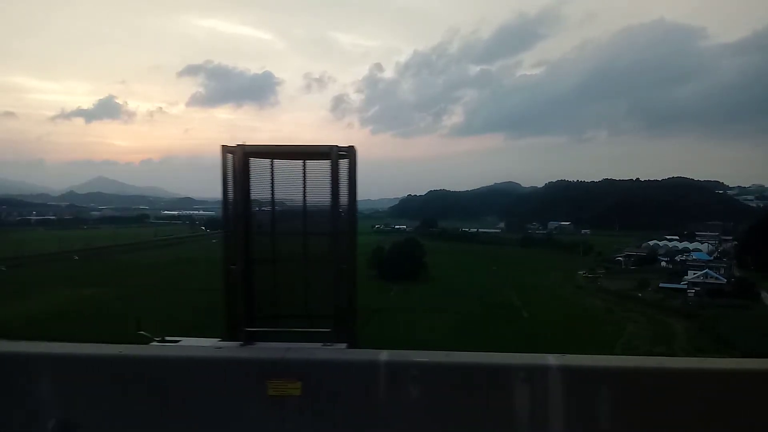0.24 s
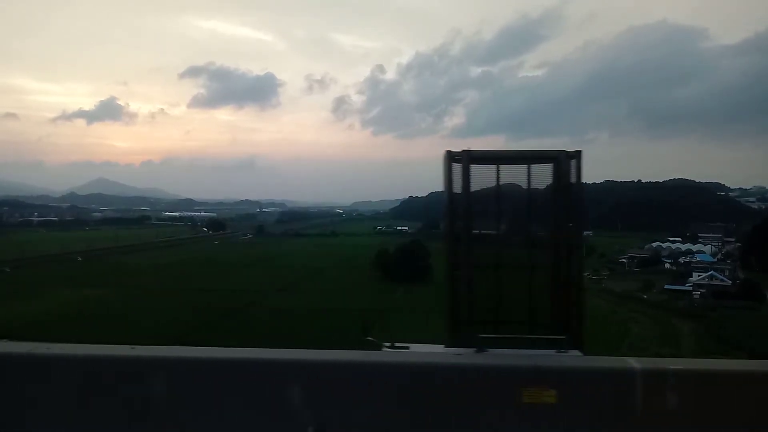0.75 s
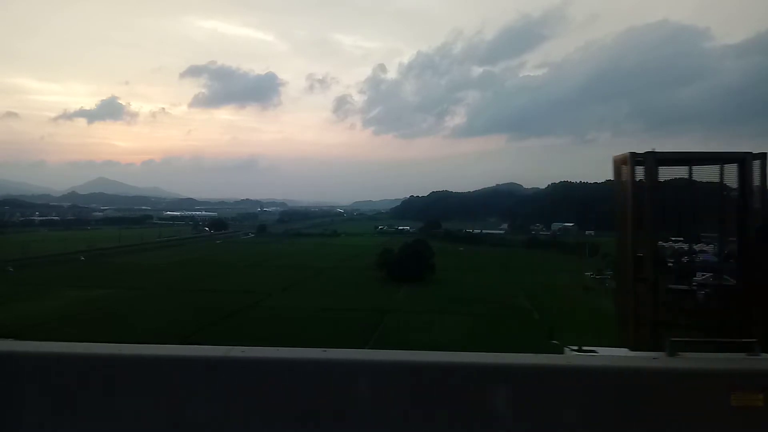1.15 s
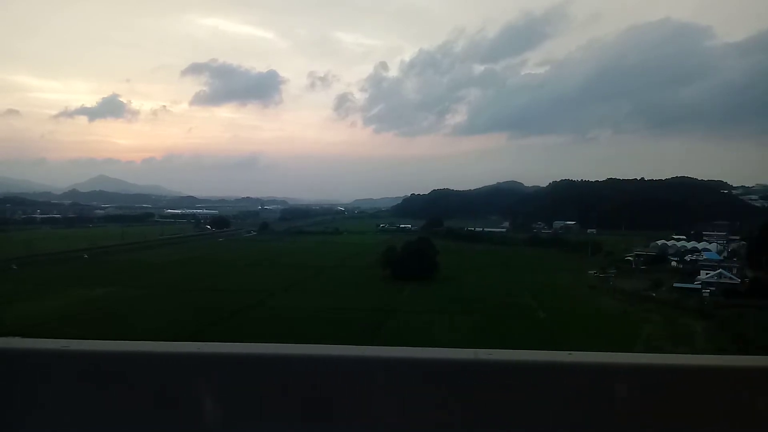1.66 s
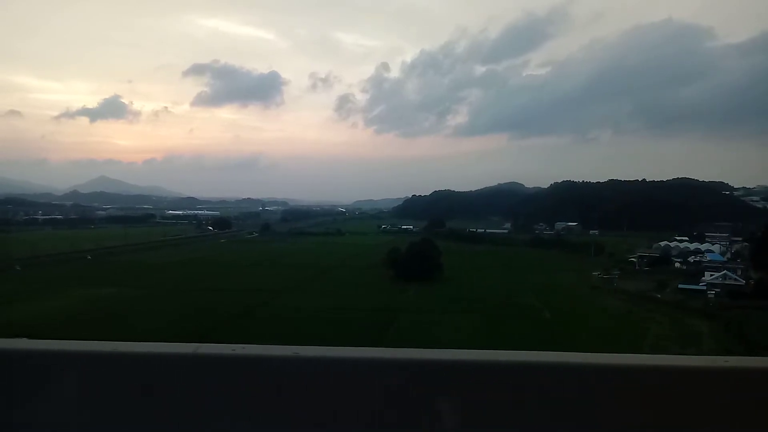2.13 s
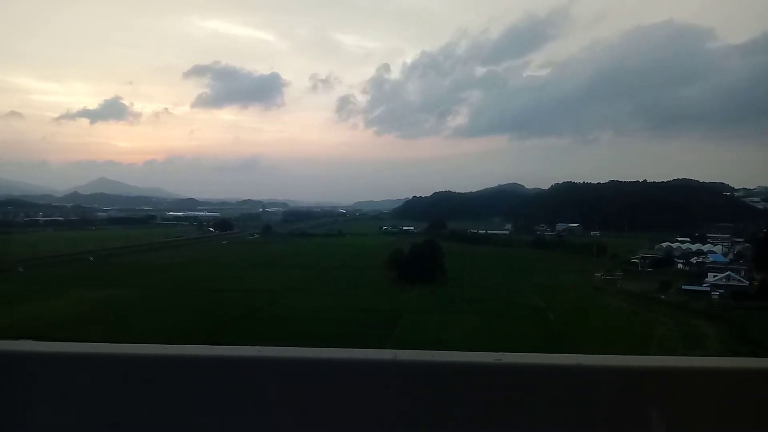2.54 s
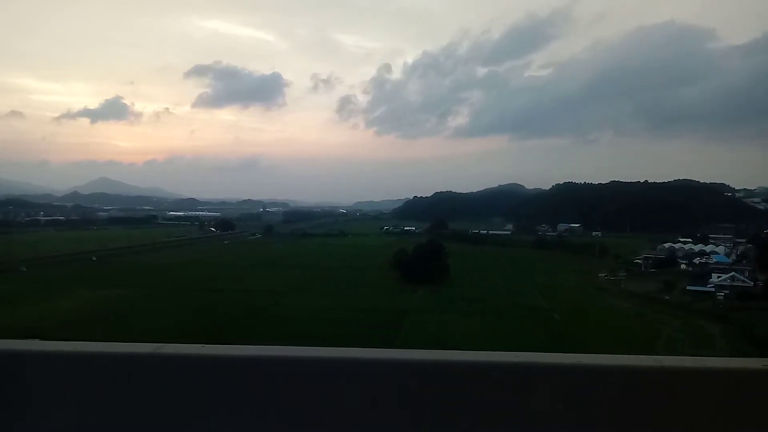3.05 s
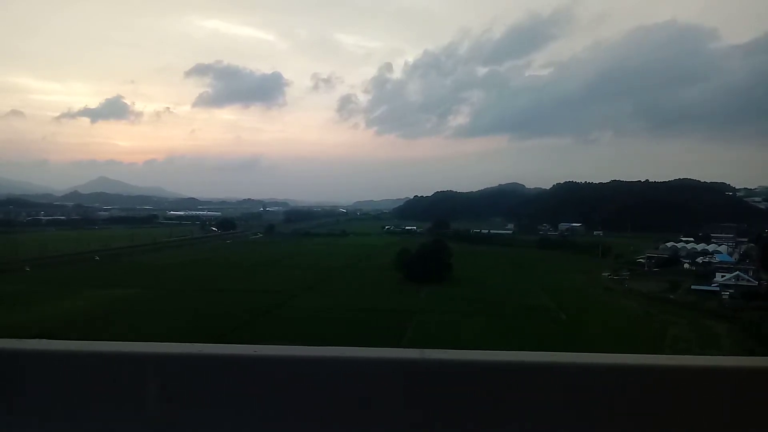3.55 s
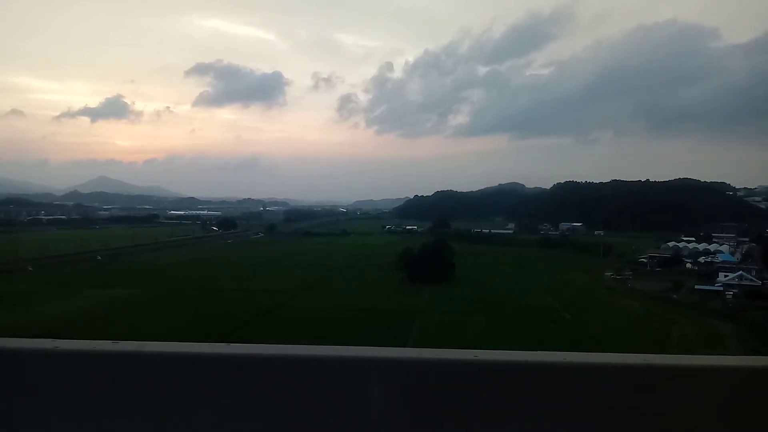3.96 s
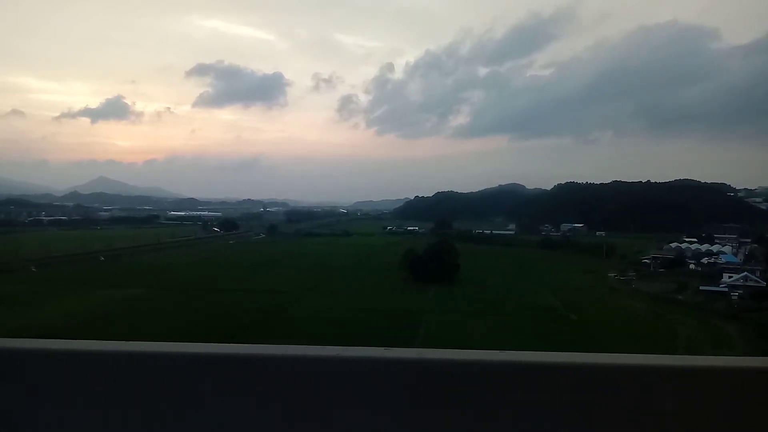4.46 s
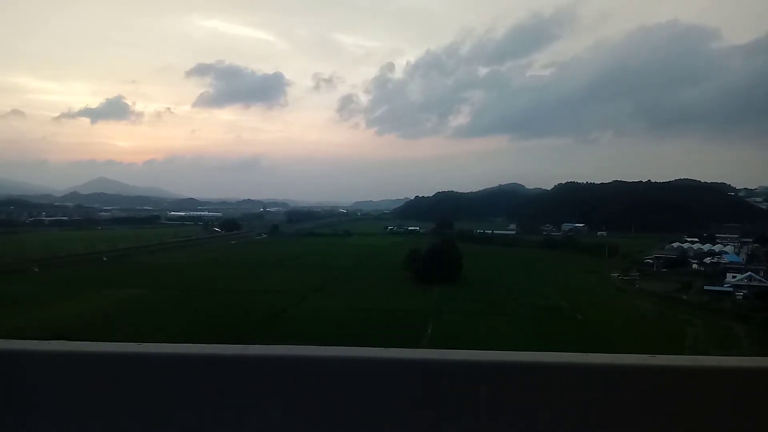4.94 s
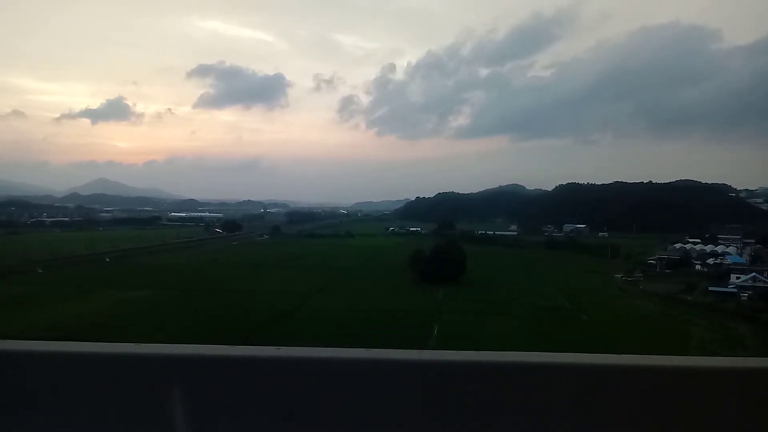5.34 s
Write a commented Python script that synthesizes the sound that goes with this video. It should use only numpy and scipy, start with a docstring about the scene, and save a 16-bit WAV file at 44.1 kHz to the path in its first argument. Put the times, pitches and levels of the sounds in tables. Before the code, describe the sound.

Inside a coach on a highway, a deep engine drone and road rumble hold steady, then slowly climb, with small trim ticks and creaks.

```python
"""Inside a coach on a highway. It cruises with a booming exhaust, which sags at 0.5 s as the throttle lifts.
From 2.2 s it pulls and slowly gathers speed: engine, shaft and tyres hum at fixed multiples of the crank speed
and swell as they cross cabin resonances. Trim ticks and creaks from 0.8 s; a panel scuffs from 3.5 s.
Throughout, noise bands make road rumble, tread roar, window-frame buzz and a thin background hiss;
gears whine and a blower hums as shaken sines."""
import sys
import numpy as np
from scipy import signal
from scipy.fft import rfft, irfft
from scipy.io import wavfile

SR = 44100
rng = np.random.default_rng(int(sys.argv[2]) if len(sys.argv) > 2 else 0)


def output_pcm(signal):
    """Save a mono or channel-first signal as 16-bit PCM at the path in sys.argv[1].

    Samples are clipped to [-1, 1] before scaling.
    """
    pcm = np.clip(np.atleast_2d(signal).T, -1, 1) * 32767
    wavfile.write(sys.argv[1], SR, np.round(pcm).astype(np.int16))


N = 246915

# crank speed: time_s, speed_turns_per_s
CRANK_SPEED = [(0.0, 24.13), (0.3, 23.79), (0.5, 23.11), (0.9, 23.98), (1.6, 23.87), (2.0, 24.12),
               (2.5, 24.86), (3.0, 25.45), (3.5, 26.77), (4.0, 27.39), (5.0, 29.0), (5.6, 30.1)]
# throttle lifts that make the drone sag: centre_s, length_s, change_db
THROTTLE_LIFTS = [(.52, 0.37, -1)]
# exhaust resonance: centre_hz, width_hz, level_db
EXHAUST_RESONANCES = [(144.4, 5.5, 6)]
# engine orders, before the cabin: cycles_per_crank_turn, level_db
CRANK_ORDERS = [(4, -49), (8, -47), (9, -61), (10, -60), (12, -57), (14, -63.5), (15, -64.5), (16, -62.5),
                (18, -59), (20, -59), (22, -54)]
# cabin air and lining: centre_hz, width_hz, level_db
CABIN_RESONANCES = [(84.3, 8.2, -2), (112.55, 1.8, 1), (134.1, 6, 6.5), (187, 21, 0), (231.4, 2.8, -5),
                    (271.2, 20.7, 3.5), (307.9, 9.1, -3.5), (1012.5, 44, 1.5), (1089, 52, -0.5)]
# drive shaft, before the cabin: cycles_per_shaft_turn, level_db, roughness_0_to_1
DRIVE_SHAFT_ORDERS = [(4, -43.5, 0), (8, -45.5, .33)]
# weaker gears, before the cabin: teeth, level_db
WEAK_GEARS = [(35, -65), (36, -61.5), (40, -65.5), (45, -68.5)]
# tyres, before the cabin: cycles_per_wheel_turn, level_db
WHEEL_ORDERS = [(6, -56), (7, -58.5), (8, -55.5), (9, -47.5), (10, -50), (12, -44.5), (27, -62)]
# road surface coarseness, as rumble level: time_s, level_db
SURFACE_COARSENESS = [(0, -41), (1.6, -47.5), (2.8, -43), (4.1, -48.5), (4.8, -42), (5.6, -43.5)]
# colours of road rumble, tread roar, background hiss: pitch_hz, relative_density_db_per_hz
RUMBLE_COLOUR = [(15, -42.5), (42, -18.5), (62, 0.5), (90, 1.5), (135, 7.5), (175, 7.5), (220, 0),
                 (280, 2.5), (340, -4), (500, -15.5), (800, -58)]
ROAR_COLOUR = [(200, -7), (370, 1), (650, 3), (880, -3), (1060, 1), (1200, -5), (1500, -5), (1750, -16),
               (2000, -26.5), (2500, -32), (2900, -30), (3400, -44.5), (4500, -65)]
HISS_COLOUR = [(2500, -6.5), (3400, -0.5), (4300, -1.5), (5000, 0), (6000, -1), (6900, -5), (7700, -11),
               (9500, -12.5), (13800, -12), (14800, -5), (15700, -2)]
# windows, then window frames: centre_hz, width_hz, relative_level_db
WINDOW_RESONANCES = [(441.5, 45, -7.5), (548, 79, -2.5), (658.5, 24, 2), (738, 54, -3), (861.3, 52, -0.5),
                     (1028, 55, -4), (1068, 11, -4), (1343, 68, -8), (1508, 58, -11), (1664, 48, -8.5)]
FRAME_RESONANCES = [(2007, 270, 4), (2800, 230, -3)]
# window-frame buzzes: centre_s, length_s, level_db
FRAME_BUZZES = [(0.677, 0.19, -73.5), (2.765, 0.32, -82.5), (4.244, 0.076, -74), (4.45, 0.13, -72),
                (4.667, 0.14, -78), (5.3, 0.15, -85.5)]
# hard trim ticks: start_s, peak_db, brightness_db_per_octave
TRIM_TICKS = [(0.807, -58, -12), (.834, -65, -11), (1.492, -64, 3), (2.137, -58, -8), (2.161, -53, -20),
              (2.204, -59, 9), (2.408, -46.5, -5), (2.421, -57, 6), (2.551, -63, -2), (3.8302, -36, 20),
              (5.476, -54, 0)]
# trim creaks: start_s, length_s, level_db, brightness_db_per_octave
TRIM_CREAKS = [(0.806, 0.023, -73, -14.5), (2.126, 0.074, -63, -24), (2.205, .08, -71, -31),
               (2.363, 0.038, -74, -22), (2.39, 0.052, -69.5, 4), (2.438, 0.024, -74, 32),
               (3.832, 0.035, -67, 13)]
# hard trim: centre_hz, width_hz, level_db at neutral brightness
TRIM_RESONANCES = [(4720, 88, -6), (5140, 440, 4.5), (5740, 360, 6), (6230, 740, 1), (6870, 200, -1.5),
                   (8700, 790, -18.5), (12000, 2500, -27.5), (14900, 1500, -24)]
# panel scuffs: start_s, length_s, level_db, upper_ring_relative_db
PANEL_SCUFFS = [(3.463, 0.12, -67, -16), (3.816, 0.074, -58.5, -21), (3.975, 0.089, -59, -23),
                (5.536, 0.045, -44.5, -10), (5.565, 0.034, -53, -8)]
# panel, lower then upper modes: centre_hz, width_hz, relative_level_db
PANEL_LOWER_RESONANCES = [(1940, 180, 5.5), (2335, 250, 4.5), (2680, 220, 0), (3160, 360, -3.5)]
PANEL_UPPER_RESONANCES = [(5630, 840, -1.5), (6500, 450, 4), (6860, 340, -5.5), (11400, 2500, -29),
                          (15400, 900, -21)]

SHAFT_TURNS_PER_CRANK_TURN, WHEEL_TURNS_PER_CRANK_TURN = 1.3338, .364
PULL_S, PULL_RISE_S = 2.16, 0.035
SHAFT_COAST_DB, TYRE_COAST_DB = -4.5, -7.5   # drop before the pull
DRONE_DB = -39   # before the exhaust resonance
WHINE_DB = -60   # before the cabin resonances
BETWEEN_MODES_DB = -12.5   # passes at all pitches
# growth per doubling of speed; levels hold at mean speed
ENGINE_DB_PER_DOUBLING, TYRE_DB_PER_DOUBLING = 12.5, 12.5
ROAR_DB, ROAR_DB_PER_DOUBLING = -48, 6
FRAME_DB, FRAME_DB_PER_DOUBLING = -80, 11.5   # lasting part, without the buzzes
BLOWER_DB, HISS_DB = -48, -79
CUTOFF_HZ = 15900


def engine(crank):
    """Firing tone, six cycles a turn, booms in the exhaust resonance; other orders grow with speed."""
    firing_hz = 6 * crank
    sag_db = sum(db * swell(s, length_s) for s, length_s, db in THROTTLE_LIFTS)
    level = from_db(DRONE_DB + sag_db) * response(firing_hz, EXHAUST_RESONANCES)
    drone = level * tone(np.cumsum(firing_hz) / SR, rough=0.034, rate_hz=12)
    other_orders = orders(crank, CRANK_ORDERS, rough=.3, rate_hz=8)
    return drone + with_speed(crank, ENGINE_DB_PER_DOUBLING) * other_orders


def drive_line(crank):
    """Shaft hums with a rougher octave, louder under load; a 41-tooth gear and weaker ones whine."""
    shaft = SHAFT_TURNS_PER_CRANK_TURN * crank
    hum = sum(orders(shaft, [(k, db)], rough, rate_hz=17) for k, db, rough in DRIVE_SHAFT_ORDERS)
    mesh_hz = 41 * crank
    whine_level = from_db(WHINE_DB) * response(mesh_hz, CABIN_RESONANCES)
    whine = whine_level * tone(np.cumsum(mesh_hz) / SR, rough=0.94, rate_hz=16)
    weak_gears = orders(crank, WEAK_GEARS, rough=0.71, rate_hz=39)
    return load(SHAFT_COAST_DB) * hum + whine + weak_gears


def tyres(crank):
    """Out-of-round tyres hum at wheel-speed multiples, louder with speed and under load."""
    level = load(TYRE_COAST_DB) * with_speed(crank, TYRE_DB_PER_DOUBLING)
    return level * orders(WHEEL_TURNS_PER_CRANK_TURN * crank, WHEEL_ORDERS, rough=0.12, rate_hz=14)


def road(crank, surge_db=2.5, patchy_db=1.3, window_db=-7.5, swell_db=5.5, fitful_db=5.0):
    """Road shakes the body, tread roars through the windows, window frames buzz fitfully."""
    rumble_db = in_time(SURFACE_COARSENESS)[0] + surge_db * drift(1.5)
    rumble = from_db(rumble_db) * noise(RUMBLE_COLOUR)
    roar = from_db(patchy_db * drift(30)) * noise(ROAR_COLOUR)
    windows = from_db(window_db) * shaken_modes(WINDOW_RESONANCES, swell_db)
    tread = from_db(ROAR_DB) * with_speed(crank, ROAR_DB_PER_DOUBLING) * (roar + windows)
    frame_level = from_db(FRAME_DB) * with_speed(crank, FRAME_DB_PER_DOUBLING) + buzzing()
    return rumble + tread + frame_level * shaken_modes(FRAME_RESONANCES, fitful_db)


def buzzing():
    """Window-frame buzz level: each one swells and dies away evenly."""
    return sum(from_db(db) * swell(s, length_s) for s, length_s, db in FRAME_BUZZES)


def blower(hum_hz=146.8, wander_hz=.4):
    """Blower hums at nearly constant speed, beside the exhaust drone."""
    turns = np.cumsum(hum_hz + wander_hz * drift(2)) / SR
    return from_db(BLOWER_DB) * tone(turns, rough=0.25, rate_hz=2.1)


def trim():
    """Small hard fitting: impulses tick and stick-slip creaks, through the same modes."""
    out = np.zeros(N)
    for s, db, tilt_db in TRIM_TICKS:
        at = round(s * SR)
        ring = resonate(signal.unit_impulse(N - at), trim_modes(tilt_db))
        out[at:] += from_db(db) * ring / np.abs(ring).max()
    for s, length_s, db, tilt_db in TRIM_CREAKS:
        out += from_db(db) * rubbed(slips(s, length_s, per_s=450), trim_modes(tilt_db))
    return out


def trim_modes(tilt_db, knee_hz=7000):
    """Contact sharpness tilts the modes below the knee: sharp weakens them, soft lifts them."""
    return [(hz, width_hz, db + tilt_db * np.log2(min(hz / knee_hz, 1)))
            for hz, width_hz, db in TRIM_RESONANCES]


def panel():
    """Plastic panel scuffs in its seat; each rub wakes the upper modes by its own share."""
    low, high = 0, 0
    for s, length_s, db, upper_db in PANEL_SCUFFS:
        rub = from_db(db) * slips(s, length_s, per_s=2500)
        low = low + rub
        high = high + from_db(upper_db) * rub
    return rubbed(low, PANEL_LOWER_RESONANCES) + rubbed(high, PANEL_UPPER_RESONANCES)


def background_hiss():
    """Thin steady noise, rising again near 15 kHz."""
    return from_db(HISS_DB) * noise(HISS_COLOUR)


def slips(start_s, length_s, per_s):
    """Uneven stick-slip clicks under a quick swell and slower fade; about unit power at the top."""
    age = np.clip((np.arange(N) / SR - start_s) / length_s * 3, 0, 30)   # peak at 1
    happens = rng.random(N) < per_s / SR
    clicks = happens * rng.uniform(.3, 1.6, N) * rng.choice([-1, 1], N)
    return clicks * np.sqrt(SR / per_s) * (age * np.exp(1 - age)) ** 2


def rubbed(clicks, modes):
    """Clicks ring a body, scaled to keep their power."""
    impulse_ring = resonate(signal.unit_impulse(SR // 10), modes)
    return resonate(clicks, modes) / np.linalg.norm(impulse_ring)


def orders(speed, table, rough, rate_hz):
    """Multiples of a turning speed, each swelling as it crosses a cabin resonance."""
    turns = np.cumsum(speed) / SR
    out = 0
    for k, db in table:
        level = from_db(db) * response(k * speed, CABIN_RESONANCES)
        out = out + level * tone(k * turns, rough, rate_hz)
    return out


def tone(turns, rough, rate_hz):
    """Sine of rms 1, amplitude and phase shaken by the share rough."""
    angle = 2 * np.pi * (turns + rng.random())
    shaken = (1 + rough * drift(rate_hz)) * np.sin(angle) + rough * drift(rate_hz) * np.cos(angle)
    return shaken * np.sqrt(2 / (1 + 2 * rough ** 2))


def response(hz, modes):
    """Gain of a set of resonances for a tone of this pitch."""
    peaks = sum(from_db(db) / np.hypot(1, (2 * (hz - centre_hz) / width_hz) ** 2)
                for centre_hz, width_hz, db in modes)
    return from_db(BETWEEN_MODES_DB) + peaks


def resonate(x, modes):
    """Parallel resonances with steep skirts."""
    out = np.zeros(len(x))
    for hz, width_hz, db in modes:
        edges_hz = [hz - width_hz / 2, hz + width_hz / 2]
        band = signal.butter(2, edges_hz, "band", fs=SR, output="sos")
        out += from_db(db) * signal.sosfilt(band, x + 1e-18)
    return out


def shaken_modes(modes, swell_db):
    """Noise-rung resonances, each swelling and fading on its own; rms 1."""
    return rms_one(sum(from_db(swell_db * drift(22)) * resonate(rng.standard_normal(N), [mode])
                       for mode in modes))


def with_speed(speed, db_per_doubling):
    """Gain that grows with speed; 1 at mean speed."""
    return from_db(db_per_doubling * np.log2(speed / speed.mean()))


def load(coast_db):
    """Gain of driven parts: coast_db while coasting, 1 under the pull."""
    coasting = .5 - .5 * np.tanh((np.arange(N) / SR - PULL_S) / PULL_RISE_S)
    return from_db(coast_db * coasting)


def swell(s, length_s):
    """Smooth rise and fall around a moment; height 1."""
    return np.exp(-(2 * (np.arange(N) / SR - s) / length_s) ** 2)


def noise(spectrum):
    """Noise of the given colour, nothing above its last point; rms 1."""
    hz, db = np.transpose(spectrum)
    grid_hz = np.maximum(np.arange(N // 2 + 1) * SR / N, 1)
    gain = from_db(np.interp(np.log(grid_hz), np.log(hz), db)) * (grid_hz <= hz[-1])
    return rms_one(irfft(rfft(rng.standard_normal(N)) * gain, N))


def drift(rate_hz):
    """Smooth random curve, changing about rate_hz times a second; rms 1."""
    hz = np.arange(N + 1) * SR / (2 * N)
    smooth = rfft(rng.standard_normal(2 * N)) / (1 + (hz / rate_hz) ** 2) ** 2
    return rms_one(irfft(smooth)[:N])


def in_time(rows):
    """Columns of a curve, one value per sample."""
    s, *columns = np.transpose(rows)
    return [np.interp(np.arange(N) / SR, s, column) for column in columns]


def from_db(db):
    """Decibels to gain."""
    return 10 ** (np.asarray(db) / 20)


def rms_one(x):
    """Scale to rms 1."""
    return x / np.sqrt(np.mean(x ** 2) + 1e-20)


def scene():
    """Sum of all sources, as heard from a window seat."""
    crank, = in_time(CRANK_SPEED)
    driven = engine(crank) + drive_line(crank) + tyres(crank)
    return (driven + road(crank) + blower() + trim() + panel() + background_hiss())[None]


def record(dry):
    """Steep low-pass at CUTOFF_HZ."""
    return signal.sosfilt(signal.ellip(10, .2, 80, CUTOFF_HZ, fs=SR, output="sos"), dry)


dry = scene()
out = record(dry)
output_pcm(out)
```